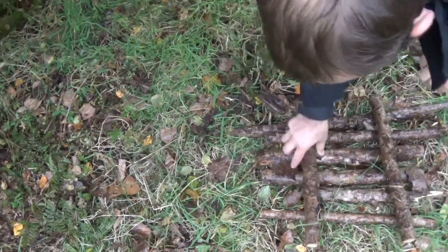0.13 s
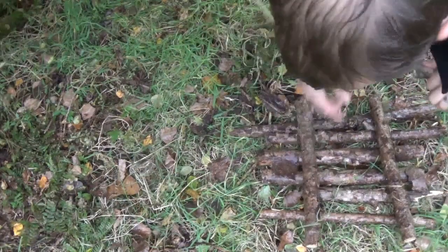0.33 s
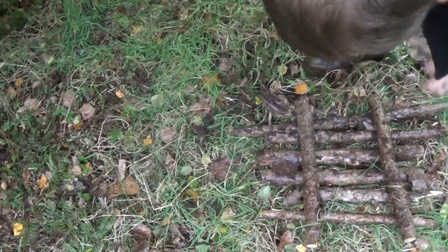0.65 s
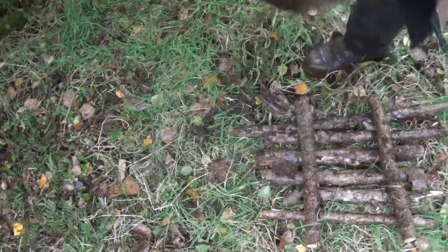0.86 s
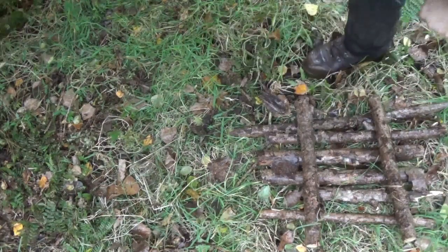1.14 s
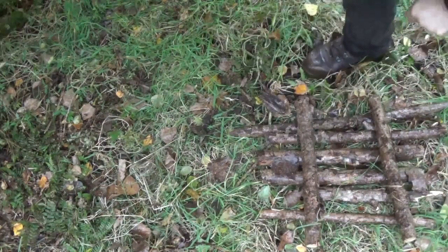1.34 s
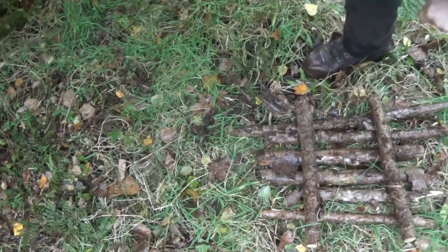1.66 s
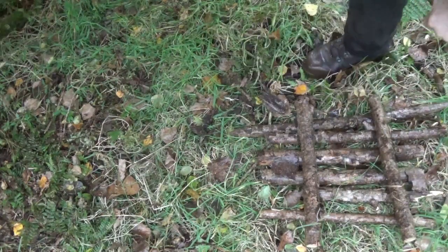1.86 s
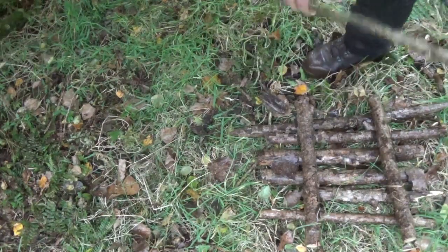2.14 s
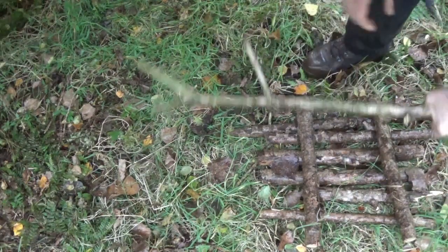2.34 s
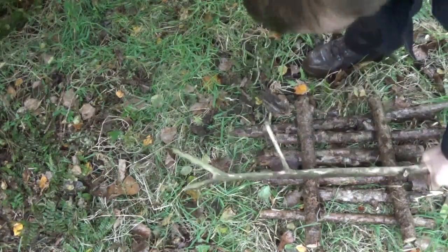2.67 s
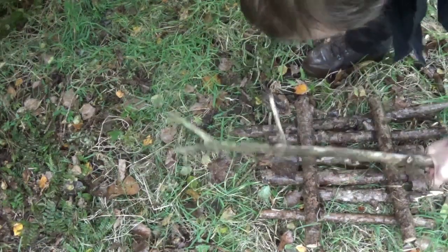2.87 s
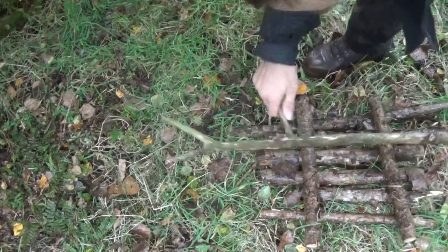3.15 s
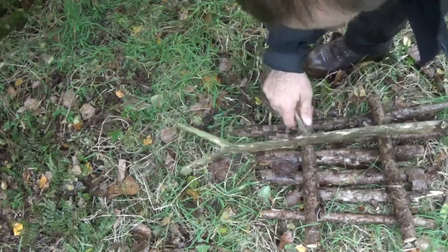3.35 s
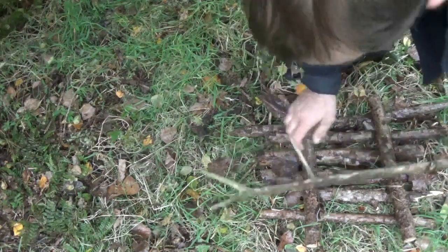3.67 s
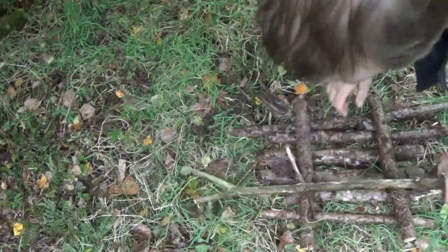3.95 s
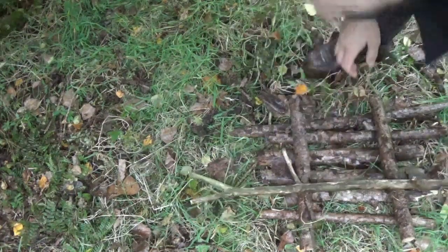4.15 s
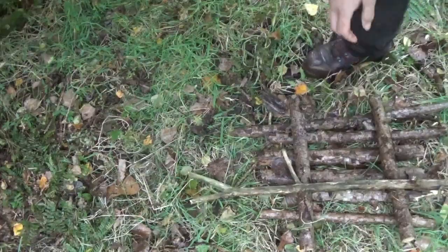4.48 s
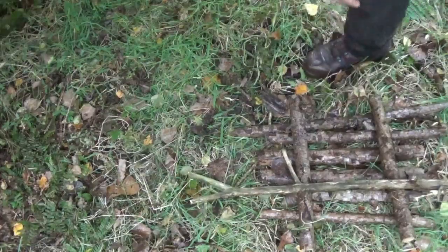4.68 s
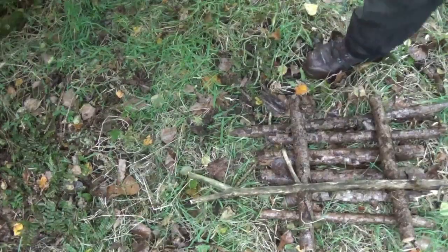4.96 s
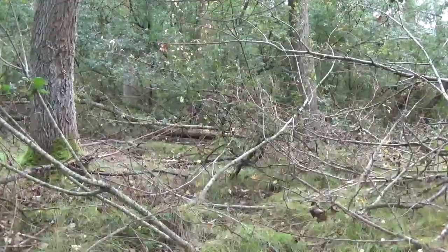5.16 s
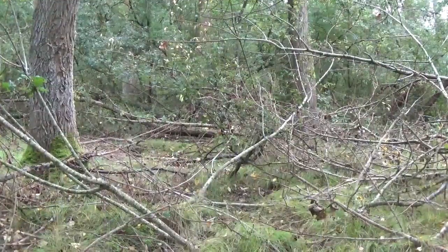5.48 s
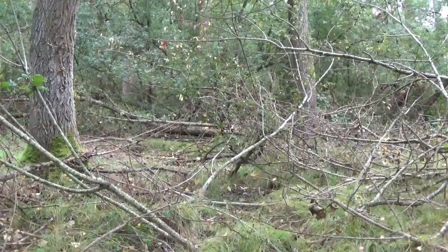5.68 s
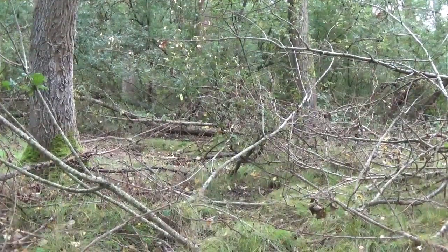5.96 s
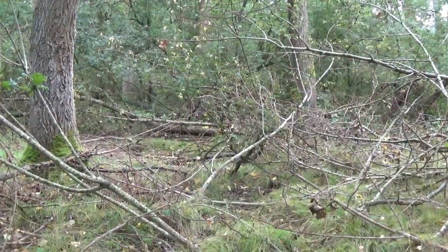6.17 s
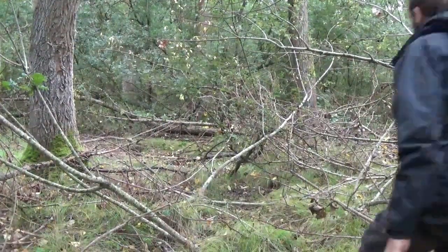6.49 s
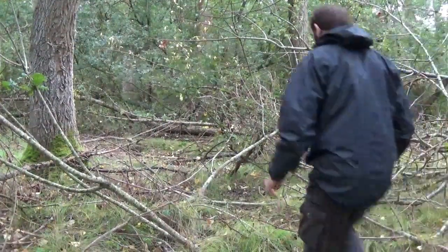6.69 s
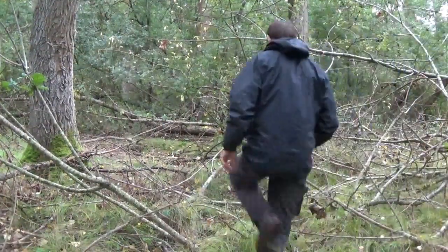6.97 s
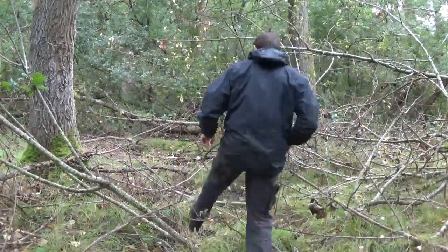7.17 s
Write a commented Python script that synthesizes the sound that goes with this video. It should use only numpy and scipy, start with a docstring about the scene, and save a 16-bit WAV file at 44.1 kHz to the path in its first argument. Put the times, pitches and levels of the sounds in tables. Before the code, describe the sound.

Wind in distant leaves makes a steady rushing hiss in a wood. Close by, a dry stick knocks sharply on a small wooden frame, followed by scattered lighter taps and a brief sleeve rustle as the hiss grows. The wind then abruptly turns wider and quieter before swelling again, and someone walks past, boots thudding softly on mossy soil while twigs and dry leaves snap and crackle.

```python
"""Sticks and footsteps in a windy wood.

Wind in countless far leaves makes a steady rushing hiss. Dry sticks are laid on a small wooden frame:
one sharp knock with its bounces, then light touches, each scattered by the trees; a sleeve rustles.
At CUT_S the scene cuts from the forest floor to the open wood: the hiss turns wide and someone walks
past, boots puffing on soft soil, twigs and dry leaves snapping as they are brushed."""
import sys
import numpy as np
from scipy import signal
from scipy.fft import rfft, irfft
from scipy.io import wavfile
from scipy.ndimage import uniform_filter1d

SR = 44100
rng = np.random.default_rng(int(sys.argv[2]) if len(sys.argv) > 2 else 0)


def inscribe(sig):
    """Save sig as 16-bit PCM at rate SR to the path in sys.argv[1].

    A 1-D sig is mono; a 2-D sig holds one channel per row.
    Samples are clipped to [-1, 1] before scaling.
    """
    pcm = np.round(np.clip(np.atleast_2d(sig).T, -1, 1) * 32767)
    wavfile.write(sys.argv[1], SR, pcm.astype(np.int16))


N = 323241
CUT_S, BAND_EDGE_HZ = 5.181, 11100

# Wind spectrum, near the ground and in the open: freq_hz, density_db
GROUND_WIND = [(20, -21), (45, -7), (100, -5.5), (190, 0.5), (350, 0.0), (700, -0.16), (1100, -2.5),
               (1650, -5.5), (2100, -4.0), (2800, -1.1), (4400, -2.5), (5800, -6.5), (6700, -9.5),
               (11000, -18.6)]
OPEN_WIND = [(20, -6), (45, -9.5), (100, -3.5), (190, 0), (350, -1), (700, -0.7), (1100, -3), (1650, -3),
             (2100, -2.5), (2800, 0.9), (4400, -1.5), (5800, -5.5), (6700, -8.5), (11000, -17)]
# S-curve rise in hiss level: quiet_db, full_db, halfway_s, ease_s, mid_growth_db
GROUND_HISS_RISE = (-40.25, -35.9, 3.95, .66, 1.7)
OPEN_HISS_RISE = (-42.9, -34.2, 5.695, .215, -.6)
# Left-right likeness of the wind: freq_hz, coherence
GROUND_COHERENCE = [(60, 0.98), (220, 0.97), (840, 0.89), (3120, 0.72), (11600, 0.69)]
OPEN_COHERENCE = [(60, .01), (11000, .01)]
# Wind balance: freq_hz, left_minus_right_db
GROUND_PAN = [(200, 0), (1500, -1.7), (3700, -2.5), (7000, -0.3)]
OPEN_PAN = [(100, -0.43), (1200, -1.4), (3500, -0.73), (10000, .4)]
# Modes of a dry stick: pitch_hz, level_db, t60_s
STICK_MODES = [(700, -25.5, 0.013), (1540, -15, .018), (1994, -8, 0.017), (2390, -7, 0.02),
               (3050, -14, 0.0069), (4000, -3, 0.0051), (4450, 5, 0.0041), (4780, 2, 0.0033),
               (7600, -6, 0.0034), (8400, -8, 0.0054), (9750, -7, 0.0034)]
# Wood-on-wood landings: start_s, level_db, hardness_db_per_octave
LANDINGS = [(0.0328, -16.5, 3.5), (.0524, -26.5, -7), (.672, -27, -1), (.7755, -28, 4),
            (2.4992, -26.5, -8.5), (3.029, -34.5, -18), (3.1028, -30, 13), (3.283, -31, -3),
            (4.290, -28.5, -4), (4.4812, -26, 1)]
# Decay of the scatter from trees: freq_hz, t60_s
TREE_DECAY = [(500, .25), (2500, 0.24), (10000, 0.13)]
# Brief rustles of sleeve, twigs and leaves: peak_s, level_db, fall_s, accent_hz, emphasis_db
RUSTLES = [(4.48, -40.5, .03, 3460, 32), (5.388, -44, .0035, 10000, 6), (6.112, -30.5, .0026, 9800, 4),
           (6.3315, -23.8, 0.0041, 5700, 11.5), (6.449, -25, 0.01, 4200, 4), (6.565, -30.5, .004, 6000, 3),
           (6.612, -26.3, 0.0071, 8050, 4), (6.648, -32, .011, 7560, 1), (6.94, -39.5, 0.05, 9000, 7),
           (7.312, -28, 0.0059, 8000, 3)]
# Rustle spectrum: freq_hz, density_db
RUSTLE_SPECTRUM = [(200, -13), (700, 4), (1800, 2.5), (3500, 4.5), (5600, 0), (8000, 1.5), (11000, 0.5)]
# Boot pushes: peak_s, level_db, half_width_s
BOOT_PUSHES = [(6.109, -23, .005), (6.344, -34, 0.011)]
# Soft soil spectrum: freq_hz, density_db
SOIL_SPECTRUM = [(60, -13), (200, -9), (330, 3), (500, 5), (800, -4), (1200, -2), (1800, -18), (6000, -40)]


def gain_of(db):
    """Decibels to amplitude."""
    return 10 ** (np.asarray(db) / 20)


def unit_rms(x):
    """Scales to rms 1."""
    return x / np.sqrt(np.mean(x ** 2) + 1e-20)


def lookup(table, hz):
    """Interpolates on a log-frequency axis."""
    table_hz, value = np.transpose(table)
    return np.interp(np.log(hz + 1), np.log(table_hz + 1), value)


def coloured(x, spectrum):
    """Filters by a spectrum table, to rms 1."""
    length = x.shape[-1]
    gain = gain_of(lookup(spectrum, np.fft.rfftfreq(length, 1 / SR)))
    return unit_rms(irfft(rfft(x) * gain, length))


def panned(x, balance_db):
    """Leans left (positive) or right (negative)."""
    return x * gain_of(np.array([[balance_db], [-balance_db]]) / 2)


def add(mix, start_s, sound):
    """Mixes in a mono sound."""
    part = mix[round(start_s * SR):][:len(sound)]
    part += sound[:len(part)]


def wind(spectrum, rise, coherence, pan, flicker_db, mid_hz):
    """A steady rushing hiss that grows louder once, the mid range by its own amount."""
    fft_size, hop = 1024, 256
    frames, hz = N // hop + 5, np.fft.rfftfreq(fft_size, 1 / SR)
    t = np.arange(frames) * hop / SR
    re, im, other_re, other_im, flicker = rng.standard_normal((5, frames, len(hz)))
    flicker = uniform_filter1d(flicker, size=16, axis=0)
    flicker = unit_rms(uniform_filter1d(flicker, size=14, axis=1))
    quiet_db, full_db, halfway_s, ease_s, mid_growth_db = rise
    fullness = .5 + .5 * np.tanh((t - halfway_s) / (2 * ease_s))
    mid_db = mid_growth_db * (fullness[:, None] - .5) * np.exp(-np.log2((hz + 1) / mid_hz) ** 2)
    shared, pan_db = lookup(coherence, hz), lookup(pan, hz)
    left = re + 1j * im
    right = shared * left + np.sqrt(1 - shared ** 2) * (other_re + 1j * other_im)
    bins = np.array([left, right]) * gain_of(lookup(spectrum, hz) + mid_db + flicker_db * flicker)
    bins *= gain_of(np.array([pan_db, -pan_db]) / 2)[:, None]
    bins *= hz < BAND_EDGE_HZ * 1.05
    hiss = signal.istft(bins.transpose(0, 2, 1), nperseg=fft_size, noverlap=fft_size - hop)[1][:, :N]
    level_db = np.interp(np.arange(N) / SR, t, quiet_db + (full_db - quiet_db) * fullness)
    return unit_rms(hiss) * gain_of(level_db)


def stick_contacts(bounces=3, first_gap_s=.0035, gap_ratio=.55, rest_db=-30):
    """A firm landing rebounds ever sooner, softer and duller. Rows as in LANDINGS."""
    landing_loss_db, bounce_loss_db, dulling_db_per_octave = 8, 1.0, 1.3
    contacts = []
    for start_s, level_db, hardness in LANDINGS:
        contacts.append((start_s, level_db, hardness))
        for k in range(1, bounces + 1):
            start_s += first_gap_s * gap_ratio ** (k - 1)
            rebound_db = level_db - landing_loss_db - k * bounce_loss_db
            if rebound_db > rest_db:
                contacts.append((start_s, rebound_db, hardness - k * dulling_db_per_octave))
    return contacts


def sticks(detune_ratio=.042, cushion_s=.00029):
    """Each contact rings the damped modes of dry wood; a harder one favours the high modes."""
    out, t = np.zeros(N), np.arange(SR // 10) / SR
    pitch_hz, mode_db, t60_s = np.transpose(STICK_MODES)[:, :, None]
    decay = np.exp(-np.log(1000) * t / t60_s)
    for start_s, level_db, hardness in stick_contacts():
        detuned_hz = pitch_hz * (1 + detune_ratio * rng.standard_normal(pitch_hz.shape))
        strength = gain_of(mode_db + hardness * np.log2(pitch_hz / pitch_hz[0]))
        ring = (strength * decay * np.sin(2 * np.pi * detuned_hz * t)).sum(0)
        ring *= 1 - np.exp(-t / cushion_s)  # bark cushions the contact
        add(out, start_s, gain_of(level_db) * ring / abs(ring).max())
    return out


def tree_scatter(x, rise_s=.006):
    """Ground, trunks and twigs return a short, diffuse, bright tail."""
    hz, t, bins = signal.stft(rng.standard_normal((2, SR // 2)), SR, nperseg=256)
    bins *= np.exp(-np.log(1000) * t / lookup(TREE_DECAY, hz)[:, None]) * (1 - np.exp(-t / rise_s))
    colour_db = lookup([(2000, -1), (4500, -10), (8000, 11)], hz)
    tail = signal.istft(bins * gain_of(colour_db)[:, None], SR, nperseg=256)[1]
    return signal.fftconvolve(x[None], tail / np.linalg.norm(tail[0]), axes=1)[:, :N]


def surge(t, fall_s, rise_ratio=.91):
    """Exponential rise to t = 0, then exponential fall."""
    return np.exp(-np.maximum(-t / (rise_ratio * fall_s), t / fall_s))


def rustles(snaps_per_s=12000, spread_db=2.0, accent_width_octaves=.18):
    """Sleeve, twigs and leaves: each brush is a burst of tiny snaps, stressed at one pitch, then a swish."""
    swish_db, swish_lag_s, swish_stretch, swish_max_fall_s = -10, .011, 7.8, .08
    out, t = np.zeros((2, N)), np.arange(SR // 2) / SR
    hz, lead_s = np.geomspace(100, SR / 2, 200), t[-1] / 2
    for peak_s, level_db, fall_s, accent_hz, emphasis_db in RUSTLES:
        size = gain_of(spread_db * np.minimum(rng.exponential(1, (2, len(t))), 4))
        snaps = size * rng.choice([-1, 1], size.shape) * (rng.random(size.shape) < snaps_per_s / SR)
        accent_db = emphasis_db * np.exp(-(np.log2(hz / accent_hz) / accent_width_octaves) ** 2)
        crackle = coloured(snaps, np.column_stack([hz, lookup(RUSTLE_SPECTRUM, hz) + accent_db]))
        swish_fall_s = min(swish_stretch * fall_s, swish_max_fall_s)
        swish = gain_of(swish_db) * surge(t - lead_s - swish_lag_s, swish_fall_s)
        envelope = gain_of(level_db) * np.hypot(surge(t - lead_s, fall_s), swish)
        for channel, burst in zip(out, panned(envelope * crackle, balance_db=-4)):
            add(channel, peak_s - lead_s, burst)
    return out


def footsteps():
    """Moss and soil give way under the boot: a dull puff, no ring."""
    t = np.arange(N) / SR
    push = sum(gain_of(level_db) * np.exp(-((t - peak_s) / half_width_s) ** 2)
               for peak_s, level_db, half_width_s in BOOT_PUSHES)
    near = coloured(rng.standard_normal(N), SOIL_SPECTRUM)
    scattered = coloured(rng.standard_normal((2, N)), SOIL_SPECTRUM)
    return push * (.27 * near + .28 * scattered)


def scene():
    """Stick work, then a cut to the walk; rustles span both parts."""
    knocks = sticks()
    work = panned(knocks, balance_db=-3) + gain_of(-1) * tree_scatter(knocks)
    work += wind(GROUND_WIND, GROUND_HISS_RISE, GROUND_COHERENCE, GROUND_PAN, flicker_db=.85, mid_hz=1700)
    walk = footsteps()
    walk += wind(OPEN_WIND, OPEN_HISS_RISE, OPEN_COHERENCE, OPEN_PAN, flicker_db=1.04, mid_hz=1500)
    return np.where(np.arange(N) / SR < CUT_S, work, walk) + rustles()


def record(dry):
    """Steep low-pass at BAND_EDGE_HZ."""
    taps = signal.firwin(1023, BAND_EDGE_HZ, window=("kaiser", 9), fs=SR)
    return signal.oaconvolve(dry, taps[None], "same")


dry = scene()
out = record(dry)
inscribe(out)
```